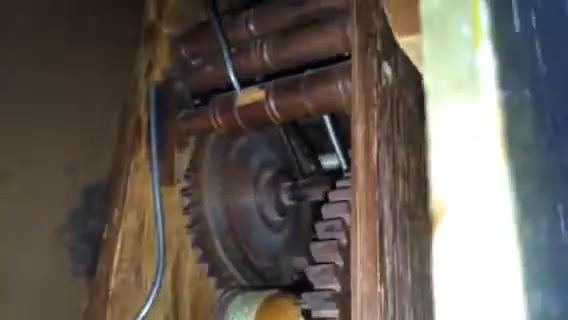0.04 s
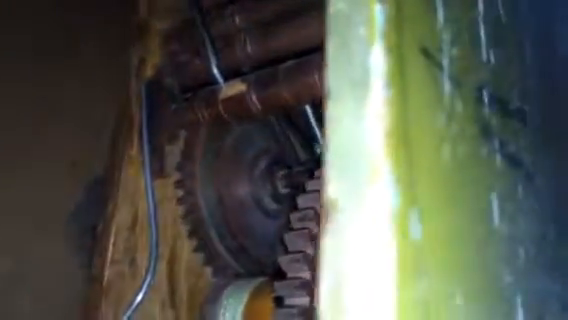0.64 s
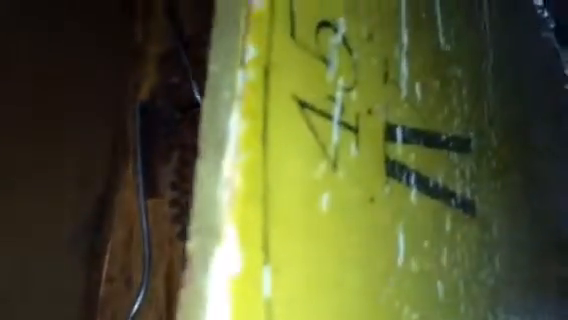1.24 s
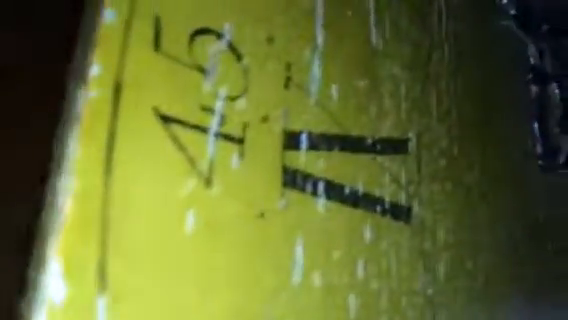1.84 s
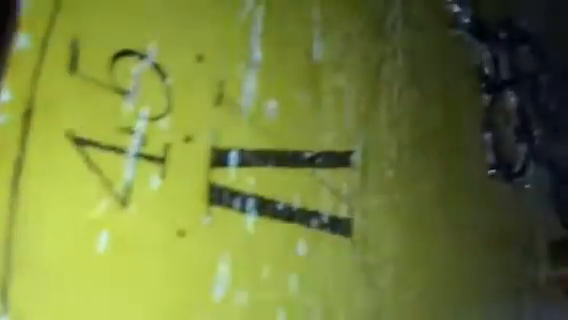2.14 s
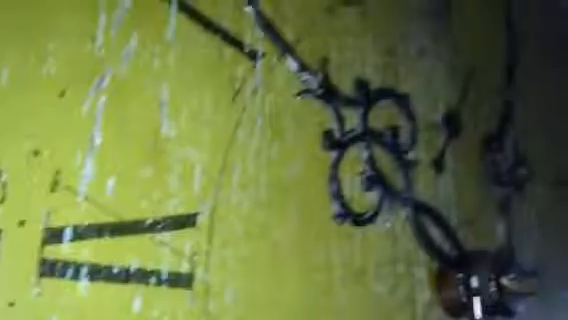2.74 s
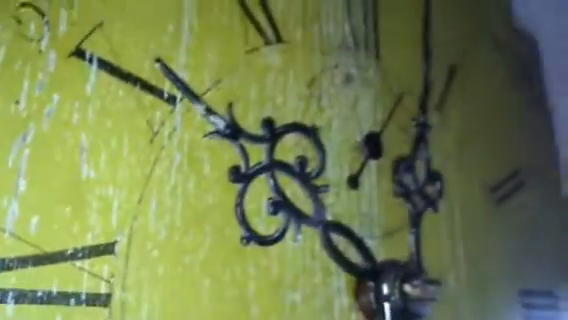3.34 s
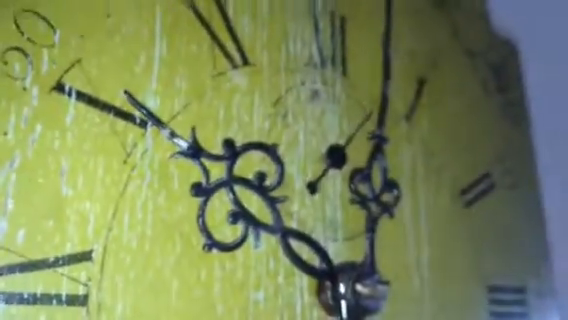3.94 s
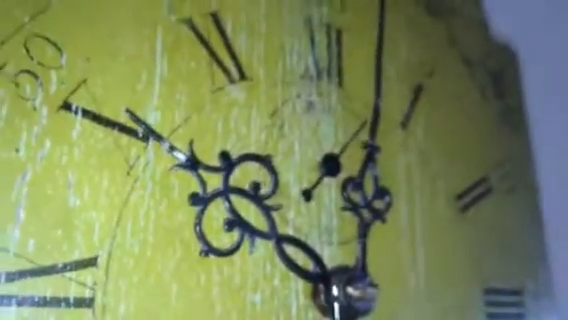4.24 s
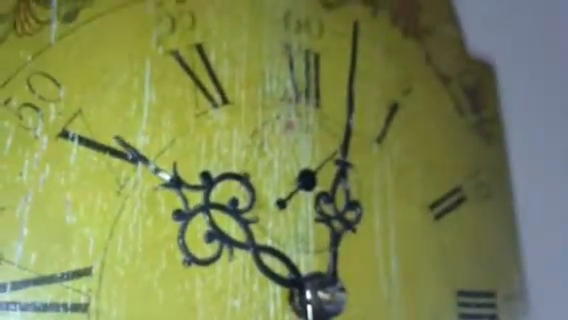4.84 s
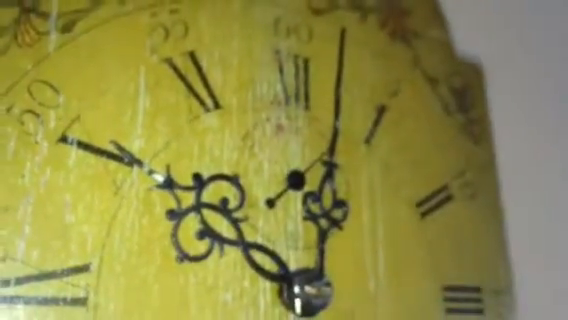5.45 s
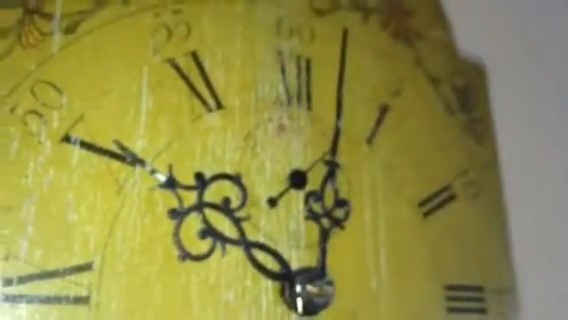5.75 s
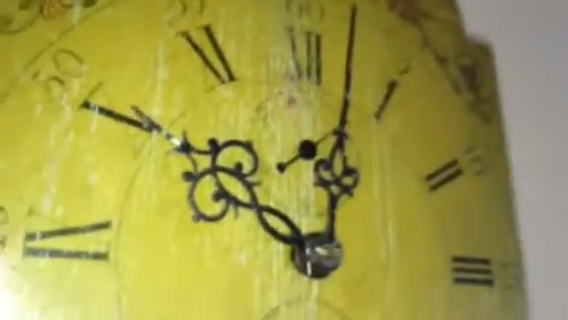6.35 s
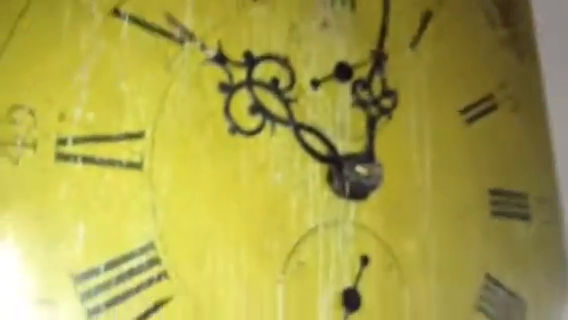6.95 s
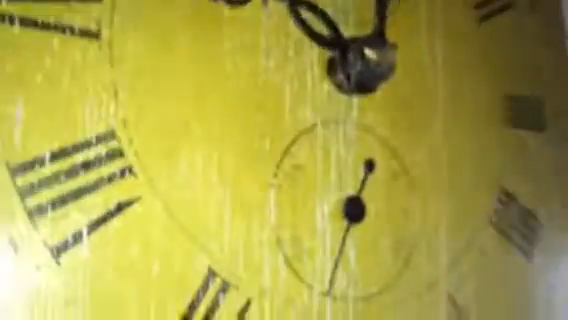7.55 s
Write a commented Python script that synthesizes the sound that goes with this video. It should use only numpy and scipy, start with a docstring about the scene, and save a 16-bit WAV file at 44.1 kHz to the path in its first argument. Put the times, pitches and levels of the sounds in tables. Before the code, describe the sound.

Steady, short tick-tock of a wooden tall clock, with a faint gong tone dying away over low room rumble and hiss.

```python
"""From the start, a quiet room rumbles and hisses softly while the gong of a tall clock's last strike fades.
The clock ticks once a second: a tooth of its escape wheel drops on one of two catches, the pallets.
The brass cracks, the dial and the wooden case ring, and the room answers. After a faint squeak, the
microphone moves from the open side of the clockwork to the dial (about 1 to 3 s), where the ticks sound
duller and more wooden. A soft knock comes just before the last beat."""
import sys
import numpy as np
from scipy import signal
from scipy.fft import rfft, irfft
from scipy.io import wavfile
from scipy.ndimage import uniform_filter1d

SR = 44100
rng = np.random.default_rng(int(sys.argv[2]) if len(sys.argv) > 2 else 0)


def persist_wave(psi):
    """Save psi, clipped to +-1, as 16-bit WAV."""
    counts = np.round(np.clip(psi, -1, 1) * 32767).astype(np.int16)
    wavfile.write(sys.argv[1], SR, np.atleast_2d(counts).T)


N = 339129
RING_TIME = np.arange(SR * 3 // 4) / SR  # seconds since a short sound began
RING_HZ = np.fft.rfftfreq(len(RING_TIME), 1 / SR)

# How each pallet sounds at the open side, tick then tock: (crack [dB], crack brightness [dB/octave],
# wheel ping [dB], case ring [dB], case brightness [dB/octave], room [dB])
PALLETS = [(4.4, 1.5, 5.3, -6, 1.9, 2), (6.8, 2.5, 4, -2, -2.5, 4.5)]


def amp(db):
    """Turns decibels into a number to multiply by."""
    return 10 ** (np.asarray(db) / 20)


def evened(x):
    """Scales a signal to an average power of 1."""
    return x / np.sqrt(np.mean(x ** 2) + 1e-20)


def curve(hz, points_hz, values):
    """Joins points by straight lines along a scale of octaves."""
    return np.interp(np.log(hz + 1), np.log(points_hz), values)


def add(mix, start_s, sound):
    """Adds a sound into the mix at its start time."""
    part = mix[max(round(start_s * SR), 0):][:len(sound)]
    part += sound[:len(part)]


def envelope(fade_s, rise_s, hold_s=0):
    """Builds up, and after hold_s dies away. A fade time is how long a drop of 60 dB takes."""
    rising = 1 - np.exp(-RING_TIME / rise_s)
    return rising * np.exp(-np.log(1000) * np.maximum(RING_TIME - hold_s, 0) / fade_s)


def dense_ring(noise, bands_hz, band_db, fades_s, rise_s, rise_cycles, hold_s=0):
    """Countless close tones: each band fades at its own speed, and low bands build up later."""
    low_cut = np.sqrt(1 + (bands_hz[0] / (RING_HZ + 1)) ** 4)
    spectrum = rfft(noise) * amp(curve(RING_HZ, bands_hz, band_db)) / low_cut
    out = np.zeros(len(RING_TIME))
    for share, hz, fade_s in zip(np.eye(len(bands_hz)), bands_hz, fades_s):
        band = irfft(spectrum * curve(RING_HZ, bands_hz, share), len(out))
        out += band * envelope(fade_s, rise_s + rise_cycles / hz, hold_s)
    return out


def ringing_tones(pitches_hz, levels_db, fades_s, rise_cycles):
    """Pure tones that take a few cycles to build up, then die away."""
    phases = rng.random(len(pitches_hz))
    return sum(amp(db) * envelope(fade_s, rise_cycles / hz) * np.sin(2 * np.pi * (hz * RING_TIME + phase))
               for hz, db, fade_s, phase in zip(pitches_hz, levels_db, fades_s, phases))


def microphone(time_s):
    """Where the microphone is, and how far from the clock."""
    # Its path: (time [s], place [0 = open side, 1 = dial], distance [m])
    path = [(1.1, 0, 0.24), (2.05, 0.4, 0.21), (3, 0.9, 0.24), (4.05, 0.99, 0.21), (5, 0.91, 0.24),
            (6.05, 0.99, 0.26), (7, 1, 0.22)]
    times, place, metres = np.transpose(path)
    return np.clip(np.interp(time_s, times, place), 0, 1), np.interp(time_s, times, metres)


def blend_db(side_db, dial_db, place):
    """Slides from the level at the open side to the level at the dial."""
    return 20 * np.log10((1 - place) * amp(side_db) + place * amp(dial_db))


def rumble_and_hiss(level_db=-67.5, patchy_db=2.5, boom_hz=94, boom_width_hz=8, boom_db=7):
    """Soft hiss over a restless rumble that booms at one low note of the room."""
    # The quiet of the room: (pitch [Hz], level [dB])
    hiss = [(25, -24), (55, -13.5), (93, -6), (135, -13.5), (220, -13), (270, -20), (356, -15.5),
            (500, -22.5), (900, -25), (1300, -28), (2000, -32), (4000, -36.5), (9000, -40), (15200, -42)]
    # The rumble's rise and fall: (time [s], level change [dB])
    rumble = [(0, 2.5), (.7, -1.5), (2.1, .5), (2.7, -2), (3.9, 2.5), (5.7, -3), (6.9, 2), (7.69, .5)]
    size, hop = 2048, 512  # samples
    t = np.arange(N // hop + 5) * hop / SR
    hz = np.fft.rfftfreq(size, 1 / SR)
    real, imaginary, patches = rng.standard_normal((3, len(t), len(hz)))
    patches = uniform_filter1d(patches, size=10, axis=0)  # smooth over time
    patches = evened(uniform_filter1d(patches, size=6, axis=1))  # and over pitch
    colour_db = curve(hz, *np.transpose(hiss)) + boom_db * np.exp(-((hz - boom_hz) / boom_width_hz) ** 2)
    steady = (real + 1j * imaginary) * amp(colour_db)
    low = curve(hz, [180, 400], [1, 0])
    middle = curve(hz, [180, 400, 2200, 9000], [0, 1, 1, 0])
    rumble_db = np.interp(t, *np.transpose(rumble))
    # The middle of the hiss is stronger beside the open case.
    middle_db = blend_db(side_db=1.5, dial_db=-1, place=microphone(t)[0])
    swell_db = np.outer(rumble_db, low) + np.outer(middle_db, middle)
    spectra = np.array([steady, steady * amp(swell_db + patchy_db * patches * low)])
    _, waves = signal.istft(spectra, nperseg=size, noverlap=size - hop, time_axis=1, freq_axis=2)
    still, moving = waves[:, :N]
    return amp(level_db) * moving / np.std(still)


def gong():
    """The end of the last strike: a few pure tones, the high ones fading sooner."""
    # The gong's tones: (pitch [Hz], starting level [dB], fall [dB/s])
    tones = [(947, -67.5, 3), (1163.6, -76.5, 3), (1396, -64.5, 7.5), (1647.5, -76.5, 6), (1923, -76.5, 6),
             (2420, -91.5, 8.5), (2466, -91, 10)]
    t = np.arange(N) / SR
    return sum(amp(db - fall * t) * np.sin(2 * np.pi * (hz * t + rng.random())) for hz, db, fall in tones)


def blow(noise):
    """Evens out the first milliseconds of a noise: a hard blow feeds all pitches alike."""
    onset = envelope(fade_s=.05, rise_s=.0005, hold_s=.003)
    power = uniform_filter1d(abs(rfft(noise * onset)) ** 2, size=200) / np.sum(onset ** 2)
    return irfft(rfft(noise) / np.sqrt(power), len(noise))


def crack(pallet, grain, db_per_octave):
    """A tooth chatters on a pallet for a few milliseconds and sets the brass ringing."""
    # The dense ring of the brass clockwork: (pitch [Hz], tick [dB], tock [dB], fade time [s])
    brass_bands = [(150, -40.5, -45.5, .12), (495.4, -34.5, -33.5, .1), (860, -23, -21, 0.074),
                   (1360, -26.5, -22.5, 0.062), (1850, -24, -26, 0.062), (2490, -18, -17.5, 0.028),
                   (3262, -28, -29.5, 0.049), (4106, -22.5, -28.5, 0.029), (5100, -28.5, -32.5, 0.031),
                   (7920, -27.5, -25, 0.027), (9200, -30.5, -33, 0.029), (11700, -31, -26.5, 0.014),
                   (14300, -40.5, -41.5, 0.03), (15280, -41, -42.5, .035)]
    hz, tick_db, tock_db, fade_s = np.transpose(brass_bands)
    band_db = (tock_db if pallet else tick_db) + db_per_octave * np.log2(np.clip(hz, 700, 9000) / 2500)
    return dense_ring(blow(grain), hz, band_db, fade_s, rise_s=.0004, rise_cycles=1.3, hold_s=.0033)


def wheel_ping(pallet):
    """The wheel and the anchor, which carries the pallets, give a short metallic ping."""
    # Their tones: (pitch [Hz], fade time [s], tick [dB], tock [dB])
    tones = [(1407.5, 0.039, -30, -34), (1993, 0.057, -35.5, -41), (2346, 0.051, -36.5, -38.5),
             (2610, 0.028, -37.5, -38.5), (2805, 0.048, -32, -30.5), (3330, 0.03, -41.5, -41),
             (3827, 0.06, -35, -47.5), (4090, 0.031, -35, -33), (4550, 0.069, -40, -44),
             (5340, 0.051, -43, -45), (6410, 0.044, -39, -39), (7080, .05, -40, -37),
             (7760, 0.036, -40.5, -42), (7960, 0.021, -42.5, -42), (8660, 0.035, -41, -39.5),
             (10760, 0.034, -46, -32), (11540, 0.029, -46, -33)]
    hz, fade_s, tick_db, tock_db = np.transpose(tones)
    return ringing_tones(hz, tock_db if pallet else tick_db, fade_s, rise_cycles=3.2)


def tooth_landing(pallet, grain, place, metres, near_m=.2):
    """Crack and ping weaken with distance and as the dial screens them; the crack also gets duller."""
    crack_db, db_per_octave, wheel_db = PALLETS[pallet][:3]
    db_per_octave = db_per_octave - 3.5 * place - 40 * (metres - near_m)
    snap = amp(crack_db + blend_db(0, dial_db=-5, place=place)) * crack(pallet, grain, db_per_octave)
    ping = amp(wheel_db + blend_db(0, dial_db=-11, place=place)) * wheel_ping(pallet)
    return (snap + ping) * near_m / metres


def case_boards(pallet, place):
    """The blow travels into the dial and the wooden case, which sound louder and darker from the front."""
    # Tones of the dial and boards: (pitch [Hz], fade time [s], tick [dB], tock [dB])
    tones = [(335, .13, -50, -43), (450, .15, -47, -45), (538, .2, -53, -47), (712, .17, -45, -55),
             (782, .17, -52, -44), (810, .22, -38, -43), (870, .08, -33, -31), (931, .2, -54, -47),
             (985, .15, -50, -41), (1080, .33, -58, -41), (1148, .18, -46, -41), (1220, .2, -56, -44),
             (1357, .16, -54, -47), (1541, .16, -53, -46), (1600, .13, -46, -48), (1796, .2, -39, -49),
             (2457, .22, -58, -55), (2625, .2, -54, -55), (2670, .19, -51, -50), (2825, .19, -51, -55),
             (2946, .2, -53, -62), (3192, .19, -53, -63), (3710, .18, -61, -58), (4820, .17, -56, -66)]
    hz, fade_s, tick_db, tock_db = np.transpose(tones)
    case_db, db_per_octave = PALLETS[pallet][3:5]
    tone_db = (tock_db if pallet else tick_db) + (db_per_octave - 2.1 * place) * np.log2(hz / 1200)
    return amp(case_db + 2 * place) * ringing_tones(hz, tone_db, fade_s, rise_cycles=4)


def case_air(pallet, place):
    """The air in the tall case booms briefly; the microphone moves through its loud and quiet spots."""
    # Standing waves in the case: (pitch [Hz], fade time [s], delay [s],
    # tick at the side [dB], tock at the side [dB], tick at the dial [dB], tock at the dial [dB])
    waves = [(184, .32, 0, -55, -45, -53, -37), (353, .34, .011, -40.5, -41, -53, -42),
             (470, .21, .002, -60, -58, -35, -42)]
    out = np.zeros(len(RING_TIME))
    for hz, fade_s, delay_s, *levels_db in waves:
        db = blend_db(levels_db[pallet], levels_db[2 + pallet], place)
        add(out, delay_s, ringing_tones([hz], [db], [fade_s], rise_cycles=3))
    return out


def room_tail():
    """Countless echoes of one beat blur into a fading wash."""
    # The room's answer: (pitch [Hz], level [dB], fade time [s])
    room_bands = [(101, -42, 0.98), (302, -35.5, 0.3637), (620, -38.5, .3), (906.4, -35.5, 0.29),
                  (1606, -39.5, 0.27), (2580, -41.5, 0.31), (3170, -48, 0.24), (4460, -50.5, .29),
                  (7000, -53, .3), (11000, -55, 0.24), (15000, -66, .22)]
    hz, db, fade_s = np.transpose(room_bands)
    return dense_ring(rng.standard_normal(len(RING_TIME)), hz, db, fade_s, rise_s=.02, rise_cycles=.81)


def wall_echoes(sound):
    """The walls and ceiling throw the sound back."""
    # The first echoes: (delay [s], level [dB])
    echoes = [(0.024, -38), (0.03, -36), (0.034, -33), (0.038, -30), (0.042, -29.5), (0.069, -49)]
    out = np.zeros(len(sound))
    for delay_s, db in echoes:
        add(out, delay_s, amp(db) * sound)
    return out


def clock(drop_s=.0075, scrape_db=-26.5, kept_share=.35):
    """On each beat a tooth scrapes off one pallet, then lands on the other: 0 ticks, 1 tocks."""
    # The beats, tick and tock in turn: (time [s], force [dB])
    beats = [(0.05, 1.5), (1.0168, 0.5), (2.0518, 1), (3.018, 0), (4.0524, 0.14), (5.014, -0.66),
             (6.0495, 0), (7.0125, 0.17)]
    out = np.zeros(N)
    # Each pallet keeps part of its own noisy texture, or grain, from beat to beat.
    own_grain = rng.standard_normal((2, len(RING_TIME)))
    for count, (time_s, force_db) in enumerate(beats):
        pallet = count % 2
        place, metres = microphone(time_s)
        fresh_grain = rng.standard_normal(len(RING_TIME))
        grain = np.sqrt(kept_share) * own_grain[pallet] + np.sqrt(1 - kept_share) * fresh_grain
        brass = tooth_landing(pallet, grain, place, metres)
        case = case_boards(pallet, place) + case_air(pallet, place)
        room_db = PALLETS[pallet][5] + .13 * place
        room = amp(room_db) * room_tail() + wall_echoes(brass)
        scrape = crack(pallet, rng.standard_normal(len(RING_TIME)), db_per_octave=-7.5)
        add(out, time_s - drop_s, amp(force_db + scrape_db) * scrape)
        add(out, time_s, amp(force_db) * (brass + case + room))
    return out


def squeak_and_knock():
    """Two short, faint bursts of noise, each around one pitch."""
    # The squeak, then the knock: (time [s], length [s], pitch [Hz], width [octaves], level [dB])
    bursts = [(0.85, 0.042, 2300, 0.093, -68), (6.971, 0.0107, 497, 1.23, -58.5)]
    out = np.zeros(N)
    for time_s, length_s, centre_hz, octaves, db in bursts:
        colour = np.exp(-.5 * (np.log2((RING_HZ + 1) / centre_hz) / octaves) ** 2)
        noise = rng.standard_normal(len(RING_TIME))
        burst = evened(irfft(rfft(noise) * colour, len(noise)))
        swell = np.sin(np.pi * np.minimum(RING_TIME / length_s, 1))
        add(out, time_s, amp(db) * burst * swell)
    return out


def scene():
    """Clock, gong and room at one microphone."""
    return (clock() + gong() + squeak_and_knock() + rumble_and_hiss())[None]


def record(dry, cutoff_hz=15350):
    """Cuts away the very highest treble."""
    low_pass = signal.firwin(255, cutoff_hz, window=("kaiser", 8), fs=SR)
    return signal.oaconvolve(dry, low_pass[None], "same")


dry = scene()
out = record(dry)
persist_wave(out)
```